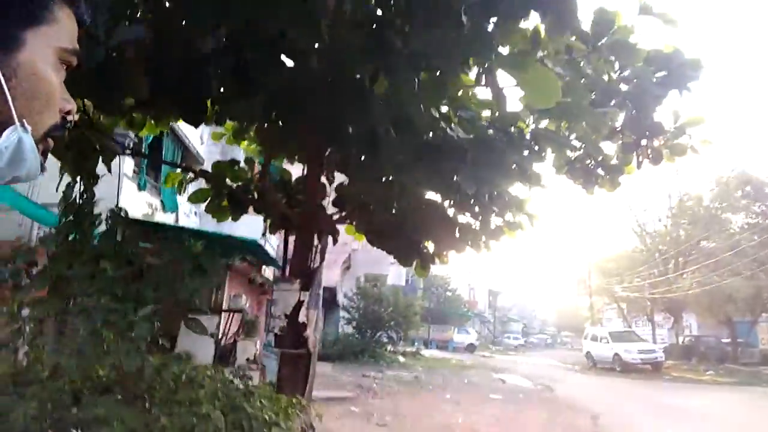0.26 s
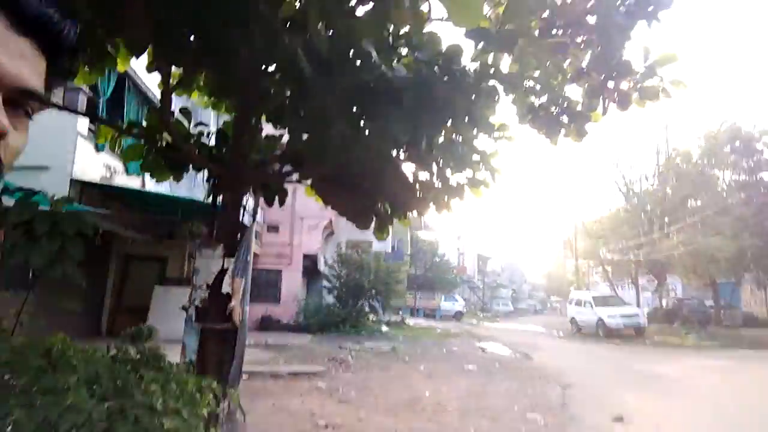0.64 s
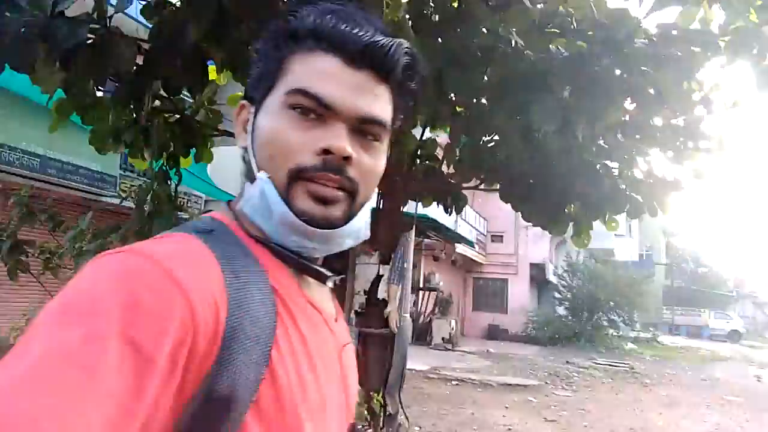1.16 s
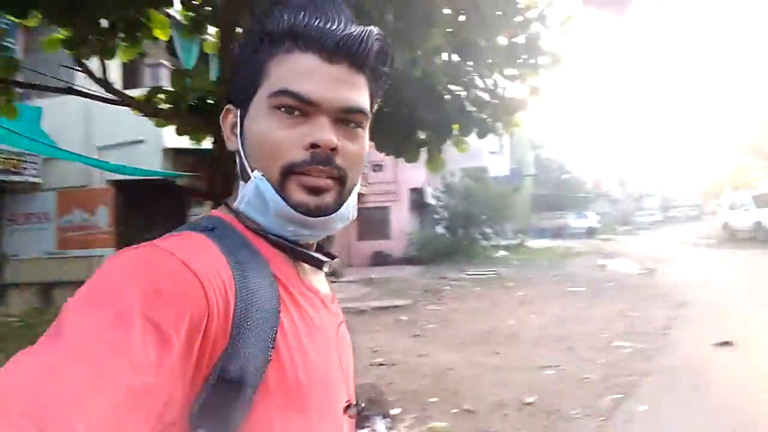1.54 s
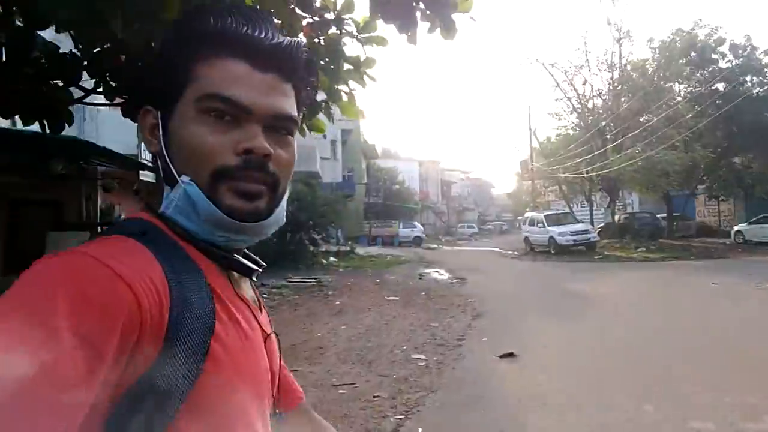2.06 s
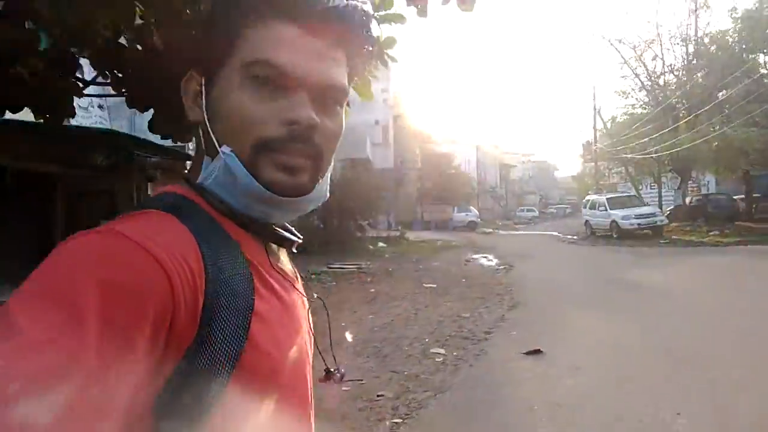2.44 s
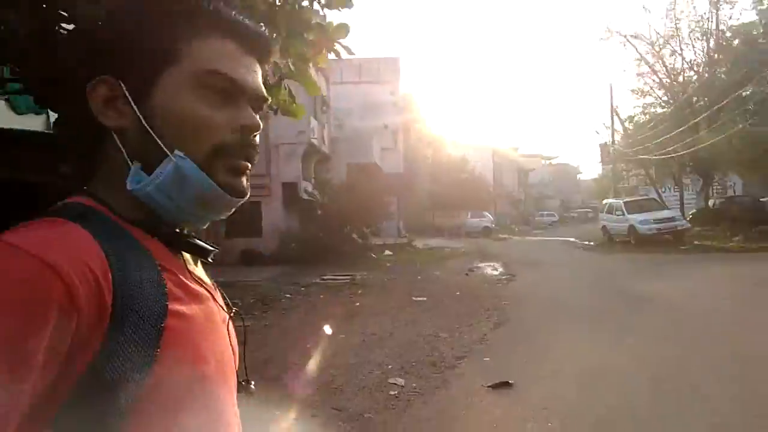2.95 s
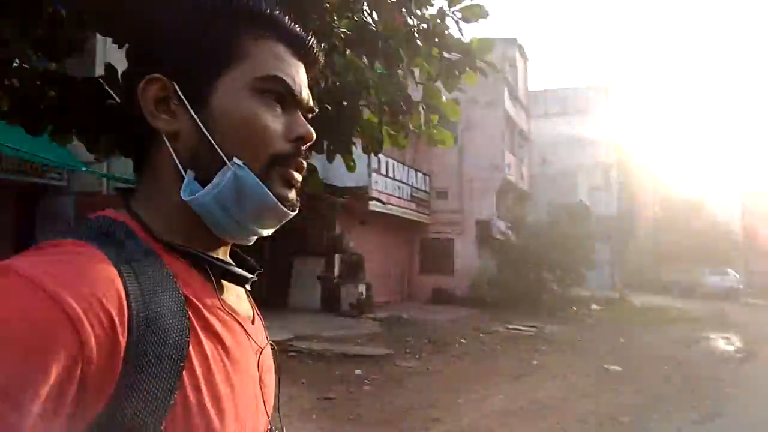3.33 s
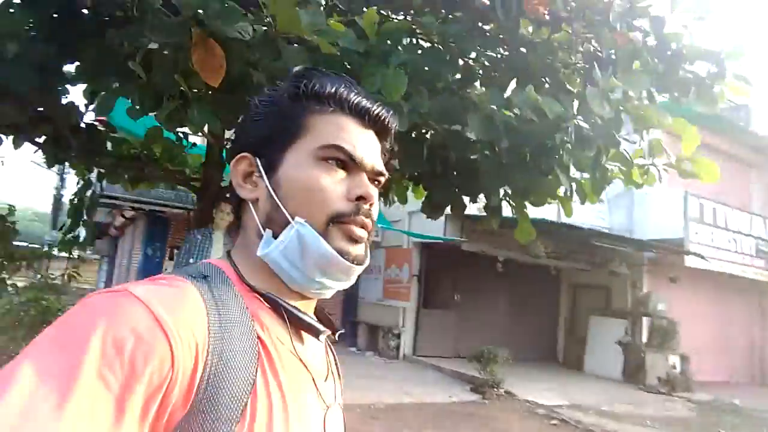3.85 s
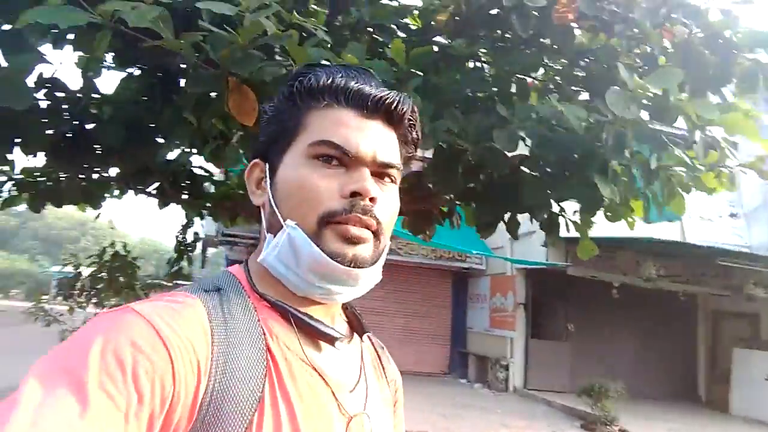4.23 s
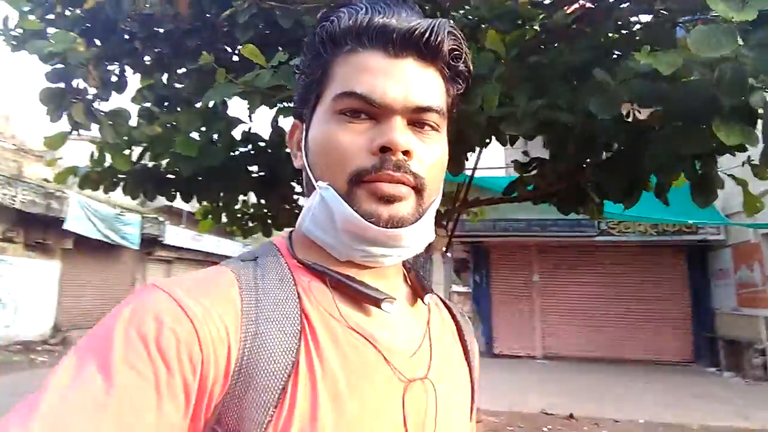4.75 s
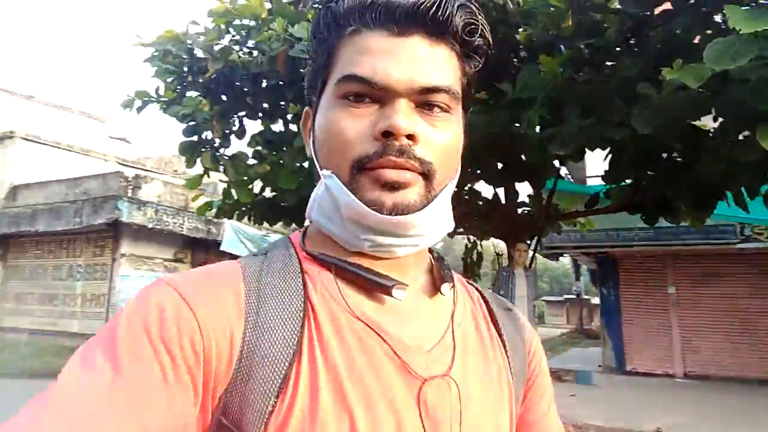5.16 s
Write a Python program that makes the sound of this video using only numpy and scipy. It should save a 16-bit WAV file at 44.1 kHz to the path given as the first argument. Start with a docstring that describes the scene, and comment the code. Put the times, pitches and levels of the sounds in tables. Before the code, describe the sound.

On a quiet street under trees, shoes scrape and crunch on grit close to the microphone, the sharpest steps coming in the second half. Throughout, small birds call in rising and falling whistles and short runs of crisp chirps over a thin, high cicada whine. Distant hoarse bird trills, a faint cooing dove and a few soft, low puffs of wind lie underneath.

```python
"""Early street under trees

Two microphone ports, left and right, are carried by a walker. Small birds whistle glides and chips,
nearly pure tones echoed by leaves and walls; far off, others chatter and a dove coos. Cicadas whine
in two bands as their clicks drive membrane resonances. Shoes crunch on grit by friction and impact,
and light wind thuds on the left port. A noise suppressor lowers the faint background."""
import sys
import numpy as np
from scipy import signal
from scipy.fft import rfft, irfft
from scipy.io import wavfile
from scipy.ndimage import uniform_filter1d

SR = 44100
rng = np.random.default_rng(int(sys.argv[2]) if len(sys.argv) > 2 else 0)


def wav_out(sig):
    """Save sig, one row per channel (or a flat mono array), as 16-bit PCM at SR to the path in sys.argv[1]."""
    wavfile.write(sys.argv[1], SR, np.round(np.clip(np.atleast_2d(sig).T, -1, 1) * 32767).astype(np.int16))


N = 238080
T = np.arange(N) / SR

# Throughout, t is time, f is frequency and side is the left level minus the right.
# spectrum of the street's noise floor: f/Hz, relative level/dB
STREET_SPECTRUM = [(59, -8), (100, -1.5), (2780, -30.5), (3250, -33), (3730, -31), (4630, -19.5),
                   (6220, 22), (6600, 17), (7140, -39), (7570, -61), (8520, -23), (9780, -33.5),
                   (11000, -94), (14300, -103), (22000, -120)]
# course of the cicada chorus: t/s, low band/dB, its side/dB, high band/dB
CICADA_LEVELS = [(0.0, -48, 13, -56.5), (0.24, -48.5, 27, -58), (0.65, -50.5, 16, -56.5),
                 (0.92, -51.5, 21, -56), (1.37, -57.5, 17, -56.5), (1.94, -47.5, 8.5, -55.5),
                 (2.25, -48.5, 14, -53.5), (2.49, -46, 7, -54), (3.02, -44.5, 5.5, -53.5),
                 (3.4, -46.5, 0, -55), (3.61, -43.5, 2, -56), (3.77, -45.5, 6, -53), (4.12, -43, 4, -55.5),
                 (4.22, -41, 2.5, -54), (4.47, -51.5, 3, -56.5), (4.96, -63.5, 5, -57.5),
                 (5.4, -58, 20, -56)]
# course of the distant bird chatter: t/s, high band/dB, low band/dB
CHATTER_LEVELS = [(0.0, -49.5, -56.5), (0.33, -56.5, -66), (0.55, -60.5, -60), (0.75, -53, -91),
                  (1.05, -53, -56.5), (1.35, -55.5, -76), (1.7, -54.5, -68), (1.9, -59, -85),
                  (2.2, -51.5, -51), (2.42, -53.5, -76), (2.85, -50, -81.5), (3.05, -52, -49.5),
                  (3.32, -50, -65.5), (3.61, -49.5, -59.5), (4.0, -50, -74.5), (4.5, -62.5, -102),
                  (4.9, -56.5, -82), (5.4, -60, -91)]
# a sole sliding on grit: t/s, duration/s, scrape/dB, lower scrape/dB, fizz/dB, thud/dB
SOLE_SLIDES = [(0.0, 0.16, -74, -57.5, -57.5, -85), (0.332, 0.3, -58.5, -56, -63, -66.5),
               (0.478, 0.24, -62, -53, -55.5, -87), (0.868, 0.31, -57.5, -54, -53, -85),
               (1.25, 0.18, -84.5, -99, -67, -86), (1.473, 0.23, -58, -96, -57, -90),
               (1.564, 0.21, -59.5, -82, -57.5, -83), (1.915, .05, -108, -89, -64, -77),
               (2.044, 0.17, -74, -85, -61, -82), (2.091, 0.27, -66, -74, -48.5, -79),
               (2.567, 0.21, -63, -96, -52, -88), (2.962, 0.16, -62, -94, -63, -89),
               (3.022, 0.4, -47.5, -47, -47, -57), (3.514, 0.39, -59, -62, -62, -76),
               (3.636, 0.31, -66.5, -104, -66, -77), (4.066, 0.3, -50, -45, -46.5, -67.5),
               (4.694, 0.26, -56.5, -102, -52, -93), (5.203, 0.32, -60, -57, -61, -95)]
# spectrum of rubbed grit: f/Hz, relative level/dB
GRIT_SPECTRUM = [(180, -106), (300, -72), (647, -7.5), (2650, -1), (5350, 5), (6300, 3), (7420, -3.5),
                 (8600, -4), (10800, -21.5), (13600, -31), (15000, -90)]
# hoarse far trills: t/s, duration/s, f/Hz, peak level/dB
TRILL_NOTES = [(0.023, 0.252, 3240, -60.5), (0.652, 0.21, 3104, -58.5), (1.222, .15, 2710, -59.5),
               (1.353, .28, 3136, -55.5), (1.709, 0.26, 3100, -58.5), (2.319, 0.2, 3104, -58),
               (3.323, 0.3, 3114, -57), (3.59, .36, 3270, -56.5), (4.334, 0.286, 3170, -62.5),
               (4.64, 0.15, 3340, -75), (4.957, 0.14, 1707, -68.5)]
# dove coos: t/s, duration/s, final f/Hz, peak level/dB
COO_NOTES = [(0.056, 0.15, 618.5, -52.5), (0.357, 0.2, 680, -55), (0.59, 0.17, 669, -56),
             (0.708, 0.072, 618, -63.5), (0.828, .08, 624.6, -48), (0.989, 0.15, 607.5, -56.5),
             (1.147, 0.15, 709.6, -56.5), (2.117, 0.19, 699, -64), (2.35, .18, 773, -61.5),
             (2.53, .21, 748.5, -61), (3.696, .15, 709, -62.5), (4.398, 0.056, 687, -68.5),
             (4.479, .19, 762, -58.5), (4.671, 0.18, 771, -56), (4.826, 0.23, 782.4, -58)]
# puffs of wind: t/s, duration/s, peak level/dB
WIND_PUFFS = [(0.196, 0.17, -63.5), (0.889, 0.079, -69.5), (1.78, 0.085, -74), (2.1, 0.052, -70.5),
              (2.567, 0.05, -75), (2.706, 0.083, -68.5), (3.397, 0.28, -53.5), (3.787, 0.089, -76),
              (4.11, 0.15, -70), (4.354, 0.28, -55), (4.558, 0.21, -67.5), (4.69, 0.081, -63),
              (4.8, 0.044, -72), (5.124, 0.32, -71.5)]
# spectrum of wind pressure at a port: f/Hz, relative level/dB
WIND_SPECTRUM = [(15, -54), (25, -26), (50, -8), (65, 3), (83, 2), (124, -7), (250, -36), (320, -87),
                 (550, -120)]
# stones snapping under a sole: t/s, knock/dB, knock f/Hz, ring/dB, tick/dB, crunch/dB, side/dB
STONE_SNAPS = [(0.261, -53.5, 1490, -46, -71, -66.5, 6), (0.368, -29, 1600, -24, -53, -46.5, 10.5),
               (0.439, -39, 685, -43.5, -63, -57.5, -1), (0.48, -55, 1710, -61, -60, -51, 16),
               (0.534, -36, 1760, -61, -45, -56.5, 12), (0.895, -36.5, 1075, -50, -35, -39, -3),
               (0.908, -38.5, 1960, -30, -57, -49, 4), (0.974, -45, 770, -48, -54, -56, -2),
               (1.49, -41.5, 1850, -41, -62, -59.5, 24), (1.594, -39.5, 1620, -50, -63, -67, 18),
               (2.06, -65, 3060, -29, -47, -63, 18), (2.107, -48, 2700, -57.5, -52, -57, -3),
               (2.133, -42, 2610, -26, -41, -60.5, 12), (2.258, -60, 3020, -56, -39, -91, 13),
               (2.59, -54, 2000, -37, -61, -70, 16), (2.999, -47, 2580, -34, -58, -94, 18),
               (3.048, -30, 2700, -24.5, -31, -57, 14), (3.055, -33, 2670, -20, -29, -45.5, 31),
               (3.0606, -33, 2600, -16.5, -40, -47.5, 22), (3.547, -30, 2000, -21, -47, -44, 10),
               (3.554, -39.5, 770, -24, -50, -51, -2), (3.767, -43, 1800, -50, -61, -74, 13),
               (4.083, -23.5, 1510, -28, -43, -37, 3), (4.09, -26, 1810, -14, -37, -46.5, 11),
               (4.095, -30.5, 746, -37, -54, -46, -1), (4.101, -30, 1040, -37, -42, -49, -13),
               (4.112, -36.5, 1480, -29, -56, -58, 12), (4.13, -55, 2200, -26, -48, -83, 17),
               (4.25, -34.5, 1580, -45, -65, -49.5, 5), (4.685, -47.5, 617, -41.5, -69, -86, 0),
               (4.72, -51.5, 2480, -52, -68, -51, 1), (4.776, -30.5, 2210, -38, -45, -48.5, 19),
               (5.224, -44, 1890, -47, -51, -48.5, 6), (5.253, -27, 2050, -48, -52, -52, 3),
               (5.344, -22.5, 1840, -52, -63, -57, 4)]
# mostly rising whistles: t/s, duration/s, first f/Hz, last f/Hz, peak level/dB, side/dB
RISING_NOTES = [(0.865, .173, 3660, 5190, -34.5, 13), (2.012, 0.016, 5000, 5470, -34.5, 8),
                (2.289, 0.017, 5050, 5400, -34, 15), (2.659, 0.027, 5150, 5080, -38.5, 14),
                (3.511, .165, 3880, 5392, -33.5, 16.5), (3.794, 0.04, 4520, 4700, -48, 12),
                (1.064, .12, 4950, 5250, -54, 6), (3.678, .11, 4400, 5380, -40.5, 20),
                (3.713, 0.035, 4900, 5020, -38.5, 7), (4.76, .137, 3750, 5143, -38, 4),
                (4.793, .137, 3797, 5090, -38, 10), (4.885, .135, 4000, 5030, -45.5, 13)]
# short falling chips: t/s, peak level/dB, side/dB
CHIP_NOTES = [(0.919, -40, 8), (0.948, -37, 24), (0.987, -35, 14), (1.024, -36.5, 10), (1.6318, -41.5, 23),
              (1.655, -30, 11), (1.6925, -31.5, 12), (1.728, -31, 16), (1.823, -41, 21), (2.3111, -40, 26),
              (2.349, -36, 14), (3.61, -28, 6), (3.648, -36, 20), (3.686, -37.5, 11.5), (4.93, -44, 7),
              (4.973, -43.5, 4), (5.0115, -39.5, -2)]
# one whistle that climbs in steps and hooks over: t/s, f/Hz, level/dB
HOOK_CONTOUR = [(1.165, 3577, -49), (1.179, 4810, -43), (1.249, 5424, -35), (1.269, 6580, -36.5),
                (1.289, 6470, -38), (1.312, 6180, -30)]
# falling whistles: t/s, duration/s, first f/Hz, last f/Hz, peak level/dB, peak time/duration, side/dB
FALLING_NOTES = [(2.074, 0.11, 7500, 4634, -39.5, 0.66, 23), (2.352, .108, 7450, 4543, -34, 0.47, 11),
                 (2.51, 0.094, 6400, 4530, -33.5, 0.25, 8.5), (2.708, .12, 7600, 4463, -34.5, 0.54, 11.5),
                 (2.859, 0.041, 5700, 4180, -37, 0.47, 6.5), (2.976, 0.042, 6100, 4100, -36, 0.36, 8.5),
                 (3.115, .025, 5380, 4630, -53, 0.46, -5), (3.239, .016, 8000, 7640, -41, .5, 9),
                 (3.256, .128, 8010, 3495, -41.5, .3, -9.5), (3.496, 0.014, 5240, 3730, -44, .6, 23),
                 (3.966, 0.031, 5400, 3920, -38.5, 0.99, 0), (4.046, 0.04, 5400, 3950, -39.5, 0.42, 1)]

# envelopes: peak time/duration, first level/dB, last level/dB (both relative to the peak)
SCRAPE_SHAPE, FIZZ_SHAPE, THUD_SHAPE = (.25, -19, -27.5), (.11, -18.5, -35.5), (.25, -18, -39)
TRILL_SHAPE, COO_SHAPE, RISE_SHAPE = (.3, -9, -15), (.28, -9.5, -15.5), (.88, -10, -7)
PUFF_SHAPE = (.27, -5.5, -7.5)


def amp(db):
    """Amplitude grows tenfold for every 20 dB."""
    return 10 ** (np.asarray(db) / 20)


def unit_rms(x):
    """Normalisation to a mean square of 1."""
    return x / np.sqrt(np.mean(x ** 2) + 1e-20)


def curves(rows):
    """Linear interpolation of each column over time."""
    times, *columns = np.transpose(rows)
    return [np.interp(T, times, column) for column in columns]


def pan(x, side_db):
    """A level difference between the ports gives direction; their mean gain is 1."""
    tilt = amp([side_db / 2, -side_db / 2]).reshape(2, -1)
    return x * tilt / tilt.mean(0)


def add(mix, start, sound):
    """Superposition of a sound on the mix from start/s."""
    part = mix[:, round(start * SR):][:, :sound.shape[1]]
    part += sound[:, :part.shape[1]]


def noise(correlation):
    """Partly coherent white noise at the two ports."""
    a, b = rng.standard_normal((2, N))
    return np.array([a, correlation * a + np.sqrt(1 - correlation ** 2) * b])


def drift(per_s, size=N):
    """Moving averages turn noise into a smooth fluctuation of rms near 1."""
    span = int(SR / per_s)
    white = rng.standard_normal(size + 8 * span)
    return unit_rms(uniform_filter1d(uniform_filter1d(white, span), span))[:size]


def patchy(x, depth_db):
    """Random amplitude modulation in patches of time and frequency."""
    spectra = signal.stft(x, nperseg=512)[2]
    field = rng.standard_normal(spectra.shape[1:])
    field = uniform_filter1d(uniform_filter1d(field, 4, axis=0), 7, axis=1)
    return signal.istft(spectra * amp(depth_db * unit_rms(field)), nperseg=512)[1][:, :N]


def coloured(x, spectrum, lo_hz, hi_hz):
    """Spectral shaping; the ports' mean has rms 1 between lo_hz and hi_hz."""
    hz = np.fft.rfftfreq(N, 1 / SR)
    points_hz, db = np.transpose(spectrum)
    shaped = rfft(x) * amp(np.interp(np.log(hz + 1), np.log(points_hz + 1), db))
    in_band = irfft(shaped.mean(0) * (hz > lo_hz) * (hz < hi_hz), N)
    return irfft(shaped, N) / in_band.std()


def filtered(x, edges_hz, kind="bandpass", order=4):
    """A maximally flat filter, steeper with each order."""
    return signal.sosfilt(signal.butter(order, edges_hz, kind, fs=SR, output="sos"), x)


def band(x, hz, width_hz, order=3):
    """A resonance passes a band about hz; the ports' mean is scaled to rms 1."""
    passed = filtered(x, [hz - width_hz / 2, hz + width_hz / 2], order=order)
    return passed / passed.mean(0).std()


def swell(start, length, db, shape):
    """Exponential growth to db and exponential decay, between fast fades."""
    peak, first_db, last_db = shape
    times = start + np.array([-.01, 0, peak * length, length, length + .03])
    near = slice(max(round(times[0] * SR), 0), round(times[-1] * SR))
    gain = np.zeros(N)
    gain[near] = amp(db + np.interp(T[near], times, [-90, first_db, 0, last_db, -90]))
    return gain


def glide(start, length, first_hz, last_hz, db, bend, shape):
    """A power law eases the pitch to its goal; gives rows of t/s, f/Hz, level/dB."""
    peak, first_db, last_db = shape
    progress = np.linspace(0, 1, 21)
    hz = last_hz + (first_hz - last_hz) * (1 - progress) ** bend
    level = db + np.interp(progress, [0, np.clip(peak, .05, .95), 1], [first_db, 0, last_db])
    return np.transpose([start + progress * length, hz, level])


def tone(contour, flutter_db, waver, per_s):
    """Random amplitude and frequency modulation roughen a sine that follows a contour."""
    times, hz, db = np.transpose(contour)
    t = np.arange(times[0], times[-1], 1 / SR)
    gain = amp(np.interp(t, times, db) + flutter_db * drift(per_s, len(t)))
    pitch_hz = np.interp(t, times, hz) * (1 + waver * drift(per_s, len(t)))
    fades = np.clip(np.minimum(t - times[0], times[-1] - t) / .0057, 0, 1)
    return np.sqrt(2) * gain * fades * np.sin(2 * np.pi * np.cumsum(pitch_hz) / SR)


def ring(hz, cycles):
    """An impact excites a damped oscillation of a few cycles, peak near 1."""
    age = 3 * T[:400] * hz / cycles
    return age * np.exp(1 - age) * np.sin(2 * np.pi * hz * T[:400])


def echoes(x, t60):
    """Sparse reflections, separate at each port, decay by 60 dB in t60 seconds."""
    taps = rng.standard_normal((2, SR)) * (rng.random((2, SR)) < .05)
    taps *= amp(-60 * T[:SR] / t60) * (T[:SR] > .003)
    return signal.fftconvolve(x.mean(0)[None], taps / np.linalg.norm(taps[0]), axes=1)[:, :N]


def street():
    """Weakly modulated coloured noise forms a faint, steady floor."""
    floor = coloured(patchy(noise(.48), depth_db=1), STREET_SPECTRUM, 112, 3100)
    return pan(floor * amp(-76), .83)


def membrane_clicks(per_s, depth):
    """A pulse train of wandering rate; weaker alternate clicks add a subharmonic."""
    phase = 2 * np.pi * np.cumsum(per_s * (1 + .015 * drift(3))) / SR
    return unit_rms(np.exp(depth * (np.cos(phase) + .7 * np.cos(phase / 2))))


def cicadas():
    """Forced vibration: pulsed noise drives two membrane resonances, with a weak hiss above."""
    low_db, side_db, high_db = curves(CICADA_LEVELS)
    low = band(noise(.2) * membrane_clicks(161, depth=.75), 6300, 520, order=2) * amp(.8 * drift(25))
    high = band(noise(.023) * membrane_clicks(330, depth=.37), 8574, 810)
    hiss = amp(-6.5) * band(noise(.13), 9567, 460)
    return pan(low * amp(low_db), side_db) + pan((high + hiss) * amp(high_db), 3.1)


def chatter():
    """Far bird calls sum incoherently into two flickering bands of noise."""
    high_db, low_db = curves(CHATTER_LEVELS)
    murmur = patchy(noise(.2), depth_db=2.5) * amp(1.2 * drift(60))
    return pan(band(murmur, 5120, 1250) * amp(high_db) + band(murmur, 3630, 730) * amp(low_db), 11.4)


def slide_gain(column, shape, rest_db):
    """Envelopes for one level column of the slides add to a faint resting level."""
    return amp(rest_db) + sum(swell(start, length, levels_db[column], shape)
                              for start, length, *levels_db in SOLE_SLIDES)


def scuffs(grains_per_s=600, crunch_t60_s=.069):
    """Friction on grit gives uneven grains over a hiss; each snap starts a decaying crunch."""
    kicks = np.zeros((1, N))
    for start, *_, crunch_db, _ in STONE_SNAPS:
        add(kicks, start, amp([[crunch_db]]))
    crunch = signal.lfilter([1], [1, -amp(-60 / crunch_t60_s / SR)], kicks[0])
    grains = amp(2.8 * np.minimum(rng.exponential(1, N), 4)) * (rng.random(N) < grains_per_s / SR)
    friction = noise(.45) * (1.6 + unit_rms(uniform_filter1d(grains, 40)))
    grit = coloured(patchy(friction, depth_db=3.5), GRIT_SPECTRUM, 1000, 2800)
    scrape = filtered(grit, [1050, 10000]) * (slide_gain(0, SCRAPE_SHAPE, rest_db=-79) + crunch)
    lower = filtered(grit, [450, 1050]) * (slide_gain(1, SCRAPE_SHAPE, rest_db=-79) + crunch)
    fizz = band(patchy(friction, depth_db=7), 15060, 5000) * slide_gain(2, FIZZ_SHAPE, rest_db=-120)
    thud = band(friction, 449, 383) * slide_gain(3, THUD_SHAPE, rest_db=-89.5)
    return pan(scrape + lower + fizz, 7.6) + thud


def trills(sag_hz_per_s=500):
    """Noise modulation spreads each sagging tone into a hoarse, narrow band."""
    rasp = filtered(noise(.098) + 1j * noise(.16), 127, "lowpass")
    rasp = rasp / abs(rasp).std() * amp(1.5 * drift(96))
    carriers = np.zeros(N, complex)
    for start, length, hz, db in TRILL_NOTES:
        turns = hz * T - sag_hz_per_s * (T - start - length / 2) ** 2 / 2
        carriers += swell(start, length, db, TRILL_SHAPE) * np.exp(2j * np.pi * turns)
    return pan((rasp * carriers).real, .4)


def dove(scoop=.072):
    """Frequency modulation makes low, upward-sliding coos husky; reverberation blurs them."""
    coos = np.zeros((2, N))
    for start, length, hz, db in COO_NOTES:
        contour = glide(start, length, hz * (1 - scoop), hz, db, bend=4.4, shape=COO_SHAPE)
        voice = tone(contour, flutter_db=2, waver=.032, per_s=59.3)
        husk = tone(contour, flutter_db=.5, waver=.0742, per_s=140)
        add(coos, start, pan(voice + amp(-6) * husk, -1))
    return amp(-.5) * coos + amp(-1) * echoes(coos, t60=.39)


def wind(breeze_db=-79):
    """Low-frequency pressure fluctuations of a breeze and its puffs, mostly on the left port."""
    gain = amp(breeze_db + 4 * drift(15)) + sum(swell(*puff, PUFF_SHAPE) for puff in WIND_PUFFS)
    pressure = coloured(noise(.3), WIND_SPECTRUM, 40, 160) * amp(1.2 * drift(12))
    return pan(pressure * gain, 14)


def snaps(bright_hz=4800, tick_hz=10500):
    """Impact excites three damped modes of a stone: a dull knock, a bright ring and a sharp tick."""
    stones = np.zeros((2, N))
    for start, knock_db, knock_hz, bright_db, tick_db, _, side_db in STONE_SNAPS:
        knock = amp(knock_db) * ring(knock_hz, cycles=3.24)
        bright = amp(bright_db) * ring(bright_hz * rng.uniform(.88, 1.12), cycles=5)
        tick = amp(tick_db) * ring(tick_hz, cycles=4.2)
        add(stones, start, pan(knock + bright + tick, side_db))
    return filtered(stones + amp(-6) * echoes(stones, t60=.45), 300, "highpass")


def whistles():
    """Small birds sweep a near sine in frequency; fast modulation roughens it."""
    notes = [(glide(*note, bend=1.1, shape=RISE_SHAPE), side_db) for *note, side_db in RISING_NOTES]
    notes += [(glide(*note, bend=1.6, shape=(peak, -16, -7)), side_db)
              for *note, peak, side_db in FALLING_NOTES]
    notes.append((HOOK_CONTOUR, 34))  # far to the left
    song = np.zeros((2, N))
    for contour, side_db in notes:
        add(song, contour[0][0], pan(tone(contour, flutter_db=3.2, waver=.009, per_s=380), side_db))
    return song


def chips(length_s=.021):
    """A brief linear downward sweep is heard as a crisp chip."""
    calls = np.zeros((2, N))
    for start, db, side_db in CHIP_NOTES:
        contour = [(0, 6400, db - 5), (length_s / 2, 6000, db), (length_s, 5600, db - 5)]
        add(calls, start, pan(tone(contour, flutter_db=.6, waver=.003, per_s=300), side_db))
    return calls


def small_birds():
    """Reflection: close leaves scatter the whistles; far walls prolong both whistles and chips."""
    song = whistles()
    leaves = amp(-6) * echoes(song, t60=.06)
    direct = song + chips()
    direct[1] = np.roll(direct[1], 3)  # reaches the right port 3 samples later
    walls = amp(-5) * echoes(direct, t60=1)
    return direct + pan(leaves + walls, 8)


def scene():
    """Linear superposition of all sources at the two ports."""
    background = street() + cicadas() + chatter()
    steps = scuffs() + snaps()
    steps[0] = np.roll(steps[0], 4)  # reaches the left port 4 samples later
    return background + steps + trills() + dove() + wind() + small_birds()


def record(dry, suppress_above_hz=700, cutoff_hz=14450):
    """Spectral subtraction lowers each bin near its own quiet level; a low-pass limits the band."""
    spectra = signal.stft(dry, nperseg=1024, noverlap=768)[2]
    power = (abs(spectra) ** 2).mean(0)
    power = uniform_filter1d(uniform_filter1d(power, 5, axis=1), 5, axis=0)
    quiet = np.percentile(power, 20, axis=1, keepdims=True)
    hz = np.fft.rfftfreq(1024, 1 / SR)[:, None]
    gain = np.clip(1 - .45 * (hz > suppress_above_hz) * quiet / (power + 1e-20), amp(-8), 1)
    clean = signal.istft(spectra * gain, nperseg=1024, noverlap=768)[1][:, :N]
    lowpass = signal.firwin(511, cutoff_hz, window=("kaiser", 9), fs=SR)
    return signal.oaconvolve(clean, lowpass[None], "same", axes=1)


dry = scene()
out = record(dry)
wav_out(out)
```